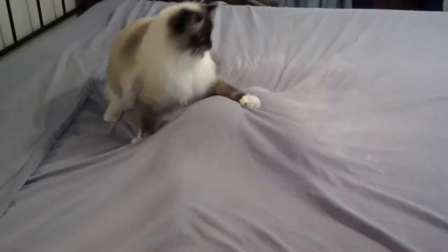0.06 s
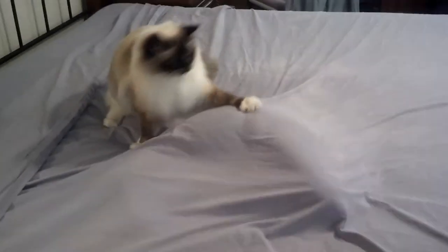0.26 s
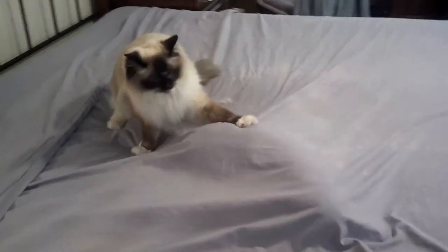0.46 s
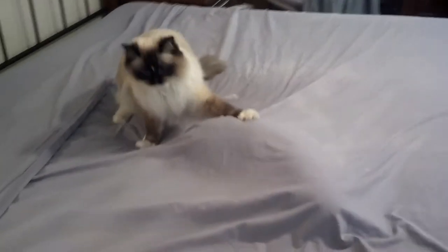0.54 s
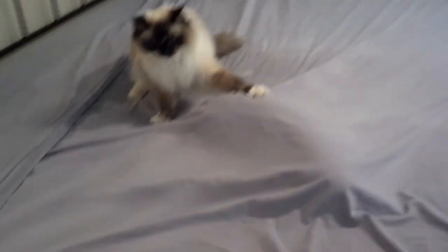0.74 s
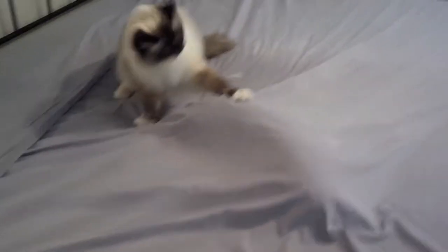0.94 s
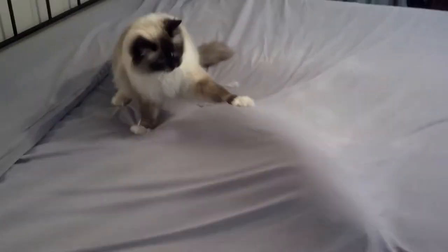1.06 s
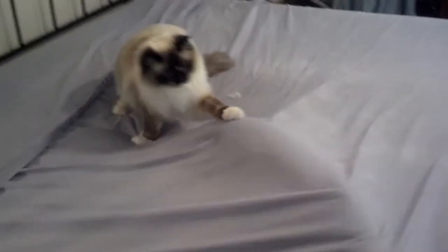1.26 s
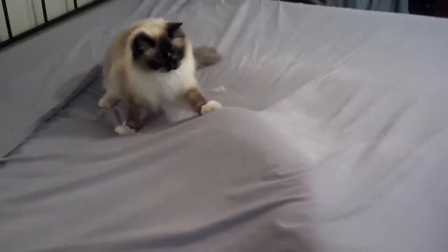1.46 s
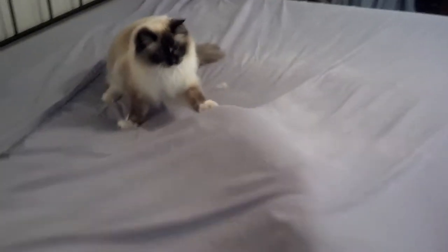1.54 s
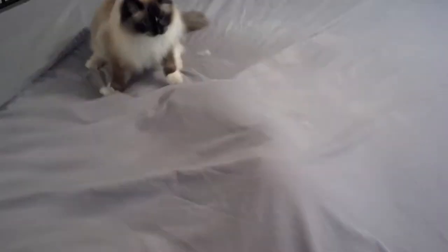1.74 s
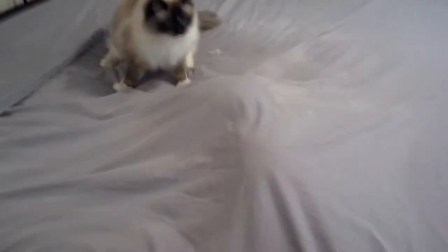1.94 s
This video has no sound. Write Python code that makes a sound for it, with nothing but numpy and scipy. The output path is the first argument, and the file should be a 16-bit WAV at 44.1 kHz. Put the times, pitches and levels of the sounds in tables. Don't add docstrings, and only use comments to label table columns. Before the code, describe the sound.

A bedsheet rustles softly on a mattress in a quiet bedroom, heard close in wide stereo. A crisp snap and dull thump come at 0.2 s, then faint nail scrapes near 0.33 s. Grainy rubbing swells around 0.5-0.75 s, with more tiny scratches. Flaps follow at 0.93 s and, fullest and most padded, 1.13 s; a lighter bump at 1.4 s, a crisp snap at 1.58 s, a faint tick at 1.8 s, then near stillness.

```python
import sys
import numpy as np
from scipy import signal
from scipy.fft import rfft, irfft
from scipy.io import wavfile
from scipy.ndimage import uniform_filter1d

SR = 44100
rng = np.random.default_rng(int(sys.argv[2]) if len(sys.argv) > 2 else 0)


def convert_level_to_amplitude(level_db):
    exponent = np.asarray(level_db, float) / 20
    return 10 ** exponent


def pcm_store(signal):
    levels = np.round(np.clip(np.atleast_2d(signal), -1, 1) * 32767)
    wavfile.write(sys.argv[1], SR, levels.astype(np.int16).T)


N = 88200

# start_s, peak_db, contact_cutoff_hz, shudder_db, mattress_weight_db
SNAPS = [(0.2, -34.5, 2200, -63, -70), (.2232, -26.5, 1120, -50.5, -40.5), (0.33, -44, 1200, -57, -58),
         (0.89, -41.5, 1340, -54.5, -51.5), (0.9329, -29.5, 1370, -50.5, -54.5),
         (1.134, -24, 1200, -41, -35), (1.146, -43, 1700, -64, -66), (1.383, -41, 1000, -51.5, -55),
         (1.5576, -55, 1300, -86, -74), (1.5809, -27, 1480, -51, -62), (1.816, -48, 1300, -86, -54.5),
         (.805, -58, 350, -70, -71), (1.416, -44, 610, -72, -50), (1.5866, -54, 1600, -55.5, -68),
         (0.23, -28.5, 176, -62, -50.5), (1.14, -61, 180, -66, -67), (1.1256, -32, 430, -72, -51.5),
         (1.1322, -35.5, 346, -72, -58), (0.64, -43, 270, -57, -50.5), (1.4, -48, 550, -59, -53)]


def rms_one(x):
    return x / np.sqrt(np.mean(x ** 2) + 1e-20)


def at_hz(points, hz):
    table_hz, values = np.array(points)[:, :2].T
    return np.interp(np.log(hz), np.log(table_hz), values)


def drift(rate_hz):
    every = 40
    pole = np.exp(-2 * np.pi * every * rate_hz / SR)
    chance = rng.standard_normal(N // every + 2002)
    slow = signal.lfilter([1], [1, -2 * pole, pole * pole], chance)[2000:]
    slow = rms_one(slow - slow.mean())
    return np.interp(np.arange(N) / every, np.arange(len(slow)), slow)


def noise():
    return rng.standard_normal((2, 2, N))


def bands(source, spectrum, patchy_db, rate_hz, shape=None, side_db=0):
    # pitch_hz, level_db
    port_side = [(40, 2), (100, -1), (180, -5), (350, -4.5), (700, -3.5), (1500, -1.5), (15000, 1.5)]
    out, power = 0, 0
    together = drift(rate_hz / 3)
    edges_hz = 28 * 2 ** np.arange(0, 9.6, .5)
    for k, (low, high) in enumerate(zip(edges_hz, edges_hz[1:])):
        band_pass = signal.butter(2, [low, high], "band", fs=SR, output="sos")
        mid, side = signal.sosfilt(band_pass, source[k % 2])
        hz = np.sqrt(low * high)
        share = convert_level_to_amplitude(at_hz(port_side, hz) + side_db)
        ports = (mid + share * side * [[1], [-1]]) / np.sqrt(1 + share ** 2)
        band = convert_level_to_amplitude(at_hz(spectrum, hz)) * ports
        power += np.mean(band ** 2)
        flicker = convert_level_to_amplitude(patchy_db * (0.34 * together + drift(rate_hz)))
        envelope = 1 if shape is None else shape(hz)
        out = out + band * flicker * envelope
    return out / np.sqrt(power)


def air():
    # pitch_hz, level_db (per Hz)
    air_spectrum = [(30, 10), (70, 8.5), (140, 5), (350, 3), (1400, -13.5), (2800, -12), (10000, -23.5),
                    (15000, -17)]
    return convert_level_to_amplitude(-55) * bands(noise(), air_spectrum, patchy_db=1.5, rate_hz=8.0)


def cloth():
    # time_s, rub_db (pressure), hiss_db (speed)
    drag = [(0, -65.5, -69.5), (.19, -59.5, -56), (.3, -57.5, -58), (.41, -59, -64.5), (.49, -52.5, -60.5),
            (.53, -57.5, -69), (.64, -50, -55.5), (0.721, -44, -60), (0.767, -60, -63.5),
            (.9, -61.5, -67.5), (0.998, -60, -54.5), (1.098, -50.5, -52), (1.27, -57.5, -58),
            (1.369, -61, -64), (1.413, -48, -62.5), (1.46, -63, -70.5), (1.54, -62.5, -65.5),
            (2, -66.5, -77)]
    # pitch_hz, level_db (per Hz)
    rub_spectrum = [(100, -35), (200, -14), (400, -6.5), (900, -5.5), (1600, -6.5), (2000, 0), (2600, -18),
                    (16000, -61)]
    # pitch_hz, level_db (per Hz)
    hiss_spectrum = [(800, -10), (2000, -26), (4500, 4.5), (7000, -6), (10500, 1.5), (13000, -47.5),
                     (15000, -2), (17000, 3)]
    grains_per_s, grain_spread_db, grain_db, clump_db = 1000, 3.0, -5, 4
    times_s, rub_db, hiss_db = np.transpose(drag)
    t = np.arange(N) / SR

    sizes = convert_level_to_amplitude(grain_spread_db * np.minimum(rng.exponential(1, N), 5.0))
    catches = rng.random(N) < grains_per_s * convert_level_to_amplitude(clump_db * drift(25)) / SR
    grains = noise() * (1 + convert_level_to_amplitude(grain_db) * rms_one(sizes * catches))

    rub = convert_level_to_amplitude(np.interp(t, times_s, rub_db)) * bands(grains, rub_spectrum, patchy_db=1.0, rate_hz=25)
    rub = signal.sosfilt(signal.butter(3, 1950, fs=SR, output="sos"), rub)
    hiss = bands(grains[::-1], hiss_spectrum, patchy_db=0.1, rate_hz=3.8)
    return rub + convert_level_to_amplitude(np.interp(t, times_s, hiss_db)) * hiss


def snaps():
    # delay_s, level_db
    echo_list = [
        (.0056, -6),
        (.0088, -11),
    ]
    # pitch_hz, level_db, t60_s (time to fall 60 dB)
    mattress = [(144.9, 3, 0.15), (223, -2, 0.11), (335, -13, 0.068), (440, -9.5, 0.097)]
    towards = [-1, -1, 1, 1, -1, 1, -1, 1, 1, -1, 1, 1, 1, -1, -1, 1, -1, 1, 1, -1]
    weave_cracks = [-51, -38, -66, -62, -52, -69, -64, -71, -68, -34, -66, -75, -77, -52, -75, -75, -75,
                    -75, -75, -73]
    booms = [-80, -32.5, -50, -57, -57, -41, -44, -72, -72, -69, -61, -59.5, -52, -69, -49, -40.5, -49, -49,
             -57.5, -56.5]
    # pitch_hz, level_db (per Hz)
    slack_spectrum = [(150, -58), (300, 17), (500, -2.5), (900, -2), (1600, -3), (2500, -12.5), (5000, -35),
                      (16000, -50)]
    # pitch_hz, level_db (per Hz)
    weight_spectrum = [(50, -17), (90, -15.5), (135, -2.5), (250, 0), (400, 3), (600, -7), (1000, -30),
                       (2000, -32)]
    contact_q, crack_fade_s, port_lag = 1.06, .0006, 2.24

    size = 8192
    out, t = np.zeros((2, N)), np.arange(size) / SR
    hz = np.arange(size // 2 + 1) * SR / size
    chance = rng.normal(0, 1, (len(SNAPS), 8))
    crack_noise = rng.normal(0, 1, (len(SNAPS), 2, size))
    echoes = 1 + sum(convert_level_to_amplitude(e) * np.exp(-2j * np.pi * hz * d) for d, e in echo_list)
    lag = np.exp(-1j * np.pi * hz / SR * (8 + port_lag * np.array([[1], [-1]])))

    events = zip(SNAPS, towards, weave_cracks, booms, chance, crack_noise)
    for (start_s, peak_db, cut_hz, _, _), sign, crack_db, boom_db, luck, rough in events:
        soft = 1 / (1 + 1j * hz / cut_hz / contact_q - (hz / cut_hz) ** 2)
        click = convert_level_to_amplitude(peak_db) * sign * soft / np.max(irfft(soft))
        crack = convert_level_to_amplitude(crack_db) * rfft(rough * np.exp(-t / crack_fade_s))
        body = 0
        for (pitch_hz, mode_db, t60_s), g in zip(mattress, luck):
            fading = convert_level_to_amplitude(mode_db + 2.0 * g - 60 * t / t60_s)
            body = body + fading * np.sin(2 * np.pi * pitch_hz * t)
        boom = sign * convert_level_to_amplitude(boom_db) * rfft(body)
        i = int(start_s * SR) - 4
        out[:, i:i + size] += irfft(lag * ((click + crack) * echoes + boom))[:, :N - i]
    return out + shudder(slack_spectrum, column=3) + shudder(weight_spectrum, column=4)


def shudder(spectrum, column):
    # pitch_hz, t60_s
    dying_times = [(120, 0.29), (400, 0.21), (1500, 0.28), (6000, 0.029)]
    rise_cycles = 0.77
    kicks = np.zeros(N) + 1e-18
    for row in SNAPS:
        kicks[int(row[0] * SR)] = convert_level_to_amplitude(row[column])

    def dying(band_hz):
        rise = np.exp(-band_hz / (rise_cycles * SR))
        fall = signal.lfilter([1], [1, -convert_level_to_amplitude(-60 / SR / at_hz(dying_times, band_hz))], kicks)
        return signal.lfilter([1 - rise], [1, -rise], fall)
    return bands(noise(), spectrum, patchy_db=1.2, rate_hz=30, shape=dying, side_db=-8)


def zips():
    # start_s, length_s, level_db, start_hz, end_hz
    nail_zips = [
        (.322, .024, -51, 5200, 2300),
        (.342, .016, -47, 1600, 1050),
        (.819, .012, -51, 3300, 2700),
        (.741, .006, -55, 14500, 13500),
        (.625, .012, -56, 4500, 4300),
        (.643, .012, -55, 3900, 3600),
    ]
    out = np.zeros((2, N))
    for start_s, length_s, zip_db, from_hz, to_hz in nail_zips:
        u = np.linspace(0, 1, int(length_s * SR))
        rough = uniform_filter1d(rng.standard_normal((2, 4000)), size=50)
        rough = .6 + rms_one(rough)[:, :len(u)]
        pitch_hz = from_hz * (to_hz / from_hz) ** u
        tone = np.sin(2 * np.pi * np.cumsum(pitch_hz) / SR)
        i = int(start_s * SR)
        out[:, i:i + len(u)] += convert_level_to_amplitude(zip_db) * np.sin(np.pi * u) ** .5 * rough * tone
    return out


def scene():
    return air() + cloth() + snaps() + zips()


def band_limit(x):
    return signal.sosfilt(signal.butter(12, 17070, fs=SR, output="sos"), x)


def record(dry):
    cross_delay = 16
    boost_from_hz, boost_to_hz, low_cut_hz, top_cut_hz = 544, 97, 187, 15900
    wide = dry - np.pad(dry[::-1], ((0, 0), (cross_delay, 0)))[:, :N]
    boost = signal.bilinear([1, 2 * np.pi * boost_from_hz], [1, 2 * np.pi * boost_to_hz], SR)
    wide = signal.lfilter(*boost, wide)
    wide = signal.sosfilt(signal.butter(2, low_cut_hz, "high", fs=SR, output="sos"), wide) / np.sqrt(2)
    wide = signal.sosfilt(signal.ellip(10, .5, 70, top_cut_hz, fs=SR, output="sos"), wide)
    return band_limit(wide)


dry = scene()
out = record(dry)
pcm_store(out)
```